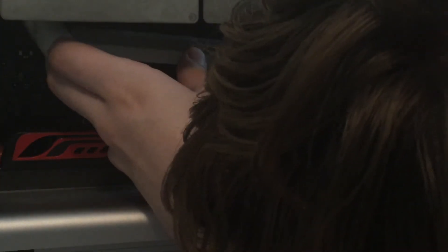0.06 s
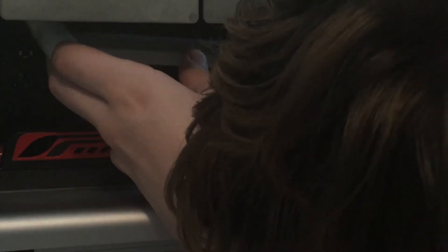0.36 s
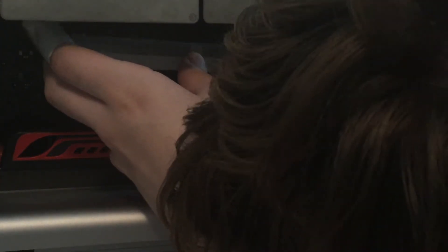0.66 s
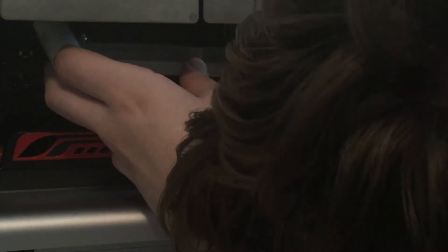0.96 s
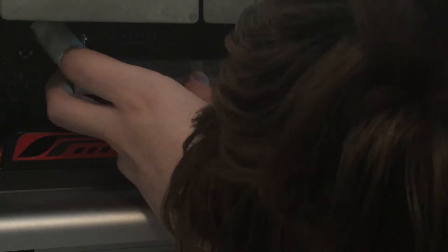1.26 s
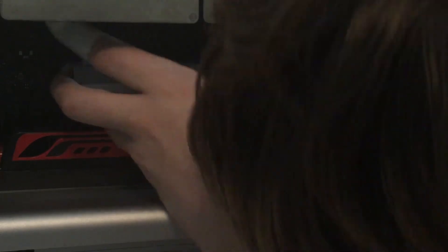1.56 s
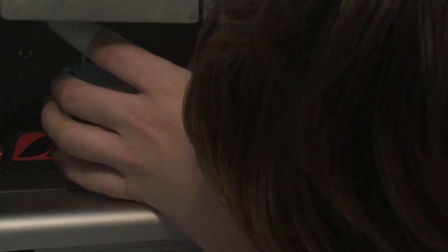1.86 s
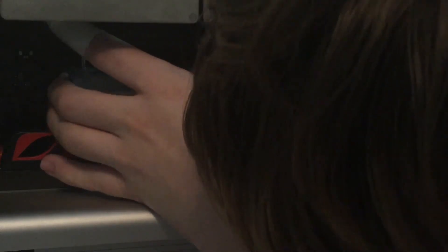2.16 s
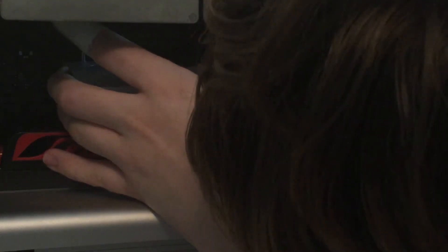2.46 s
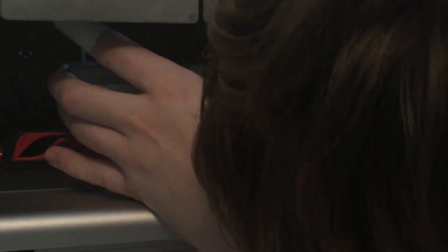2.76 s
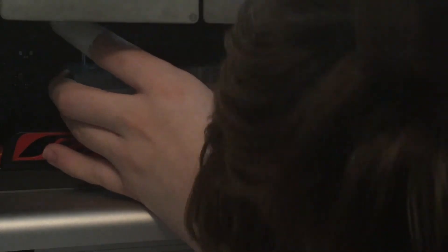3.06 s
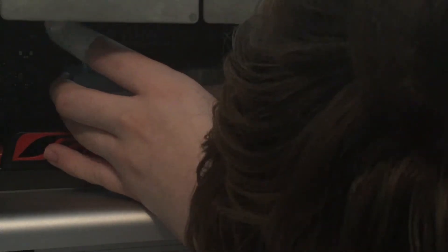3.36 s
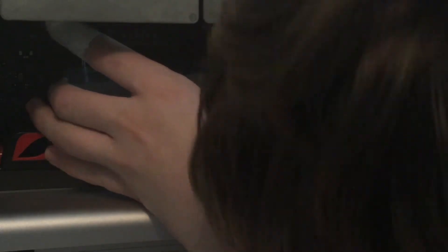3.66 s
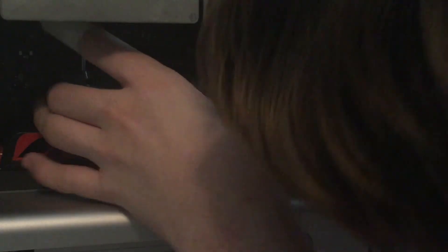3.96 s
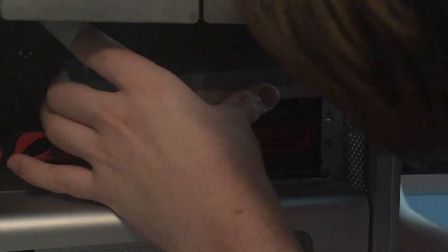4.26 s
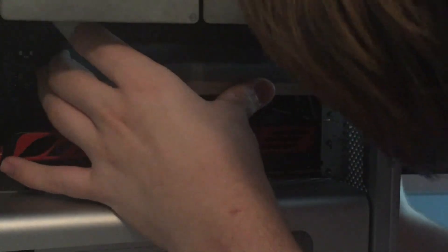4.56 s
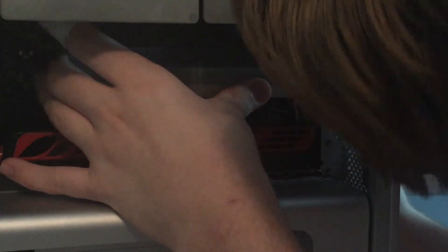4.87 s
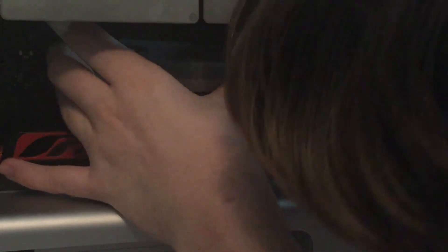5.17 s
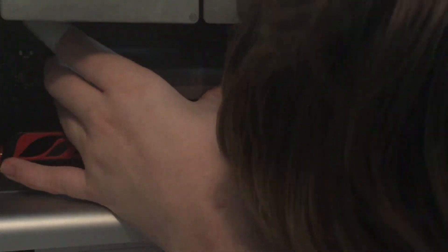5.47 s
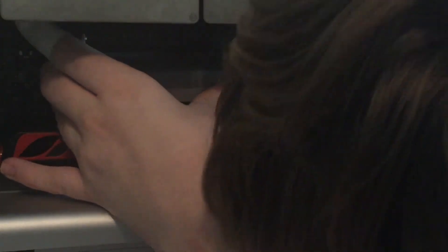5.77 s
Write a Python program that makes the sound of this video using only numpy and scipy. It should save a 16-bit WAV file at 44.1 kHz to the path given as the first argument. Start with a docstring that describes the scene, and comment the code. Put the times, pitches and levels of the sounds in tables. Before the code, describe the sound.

A circuit card knocks, clicks and scrapes against an open steel computer case as a hand works it into its slot.

```python
"""A circuit card knocks against an open steel computer case as it is worked by hand into its slot.
Bracket and edge stick and slip along the metal, scraping and squeaking, then let go and hit the frame.
Knocks and scrapes ring the case and the card; the desk reflects them and the small room rings on.
A faint hiss lies underneath."""
import sys
import numpy as np
from scipy import signal
from scipy.fft import rfft, irfft, next_fast_len
from scipy.io import wavfile

SR = 44100
rng = np.random.default_rng(int(sys.argv[2]) if len(sys.argv) > 2 else 0)


def transcribe(signal):
    """Save signal, clipped to [-1, 1], as a 16-bit WAV file at the path in sys.argv[1]."""
    frames = np.atleast_2d(signal).T
    limited = np.clip(frames, -1, 1)
    pcm = np.round(limited * 32767).astype(np.int16)
    wavfile.write(sys.argv[1], SR, pcm)


N = 265393

# Impacts on the frame. Each row: start in seconds, relative level in dB, brightness in dB per octave,
# card's share of the mode energy from 0 to 1, nearest mode in Hz.
KNOCKS = [(0.013, -43.5, -0.9, 0, 841), (0.031, -41.5, -4, 0.07, 375), (0.096, -61.5, 2.5, 0.14, 920),
          (0.2035, -31, -0.44, 0.07, 394), (0.214, -40.5, 4.5, 0.02, 675), (0.426, -39, -1, 1, 2000),
          (0.443, -40.5, -2, 0, 480), (0.8868, -42, -3.5, 1, 630), (0.9864, -41.5, -3, 0.25, 397),
          (1.0068, -38.5, -1, 0, 1030), (1.029, -45, -3.5, 0.5, 1260), (1.101, -47.5, -5, 0.2, 1190),
          (1.2268, -39.5, -2.5, 0.06, 743), (1.4045, -51, 3.5, 0.97, 2090), (1.4499, -50, 1.5, 0, 2260),
          (1.517, -44, 2.5, 0.46, 2200), (1.6794, -65, 12.5, 0.24, 3300), (1.762, -63.5, 9.5, 0.3, 2580),
          (2.187, -37.5, 4, 0.89, 423), (2.33, -43.5, -0.5, 0.08, 165), (2.437, -49, -4, 0.09, 285),
          (2.8602, -42, 2, 0.02, 2390), (3.0943, -25.5, -1.57, 0.06, 380), (3.3681, -48.5, 4, 0.77, 1270),
          (3.472, -63, -2.7, 0.5, 420), (3.948, -53.5, -4, 0.4, 235), (3.98, -50.5, 1, 0.78, 463),
          (4.182, -41.5, 0, 0.08, 458), (4.204, -52.5, -6.5, 0, 630), (4.257, -53.5, 1, 0, 990),
          (4.499, -60, 1.5, 0.7, 1800), (4.7458, -22.5, -0.5, 0.1, 3550), (4.7455, -44.5, 10, 0, 13000),
          (4.757, -29.5, -1.5, 0.2, 630), (4.8936, -30, -0.3, 0.15, 830), (5.0492, -43, 2.5, 1, 2270),
          (5.056, -52, -6, 0, 194), (5.598, -39.5, 5.5, 0.69, 2150), (5.603, -45, -5.5, 0.2, 410),
          (5.632, -50, 3, 0.73, 2210), (5.668, -53, 0.5, 0.45, 2080)]
# Sliding strokes, and at 5.616 s the loose card rattling on after the knock just before. Each row: start in
# seconds, # length in seconds, relative level in dB, brightness in dB per octave, swell over the stroke in dB,
# nearest mode in Hz.
SCRAPES = [(0.175, 0.012, -41, -0.8, 16, 880), (0.191, 0.038, -31.5, -1.5, -14.5, 625),
           (0.414, 0.057, -43.5, 1.8, 3, 387), (0.478, 0.11, -49, 0.1, -9, 1960),
           (0.808, 0.072, -52, 2.5, 4, 895), (0.961, 0.036, -47.5, 0.8, 4, 430),
           (1.155, 0.095, -48.5, -0.7, 6, 2030), (1.658, 0.026, -57, 5.5, 5, 3940),
           (1.882, 0.013, -62, 3.5, 12, 2580), (2.307, 0.023, -49.5, 0.5, 1, 2200),
           (2.617, 0.047, -66.5, 2.4, 2.5, 2280), (3.011, 0.072, -56.5, 2.3, -2, 480),
           (3.59, 0.026, -59, 1, 9, 424), (3.724, 0.072, -52.5, 0.8, 2, 286),
           (3.926, 0.16, -55.5, 2.1, -18.5, 9000), (4.142, 0.035, -47.5, 0.1, 10.5, 640.0),
           (4.188, 0.07, -50, -0.3, -1.5, 4000), (4.709, 0.055, -47.5, 1.7, 0.5, 1890.0),
           (4.873, 0.015, -29, -0.1, 14, 690.0), (5.248, 0.03, -66, -1.5, -12, 400),
           (5.557, 0.044, -58.0, 2, -5, 817.0), (5.616, 0.049, -50.5, 0.5, 12, 2060),
           (5.83, 0.044, -60.5, -1, -11, 460)]
# Slips locked to one pitch. Each row: start in seconds, length in seconds, pitch in Hz, level in dB.
SQUEAKS = [(1.873, 0.037, 2600, -55), (2.3, 0.035, 4420, -55), (3.004, 0.055, 4280, -63),
           (3.732, 0.035, 3050, -64), (4.243, 0.02, 945, -41.5), (4.878, 0.0083, 6800, -42.5)]
# Steel case modes. Each row: frequency in Hz, relative level in dB, T60 in seconds.
CASE_MODES = [(98.5, -11, 0.34), (161, -18.5, 0.39), (205.8, -12.5, 0.14), (282.1, -2.5, 0.15),
              (356, -7.5, 0.04), (404, 2, 0.16), (455.8, -4, 0.14), (564, -6.5, 0.017), (625, -4, 0.17),
              (723, -4, 0.12), (844, -3.5, 0.077), (927, -2.5, 0.11), (1067, -19.5, 0.29),
              (1310, -15.5, .13), (1634, -13.5, 0.16), (2005, -16, 0.068), (3236, -10, 0.13),
              (4210, -12, 0.059)]
# Modes of card and bracket. Each row: frequency in Hz, relative level in dB, T60 in seconds.
CARD_MODES = [(426.5, 0, 0.32), (646, -2.5, 0.13), (945, 0, 0.14), (1190, -10.5, 0.09), (1385, -7, 0.14),
              (1682, -17.5, 0.13), (2041, -5, 0.078), (2140, -3.5, 0.052), (2370, -16, 0.11),
              (3040, -12.5, 0.06), (3650, -15, 0.057), (4370, -30.5, .1)]
# Dense, weaker panel modes. Each row: frequency in Hz, relative spectral density in dB.
PANEL_SPECTRUM = [(50, -44), (130, -27.5), (200, -6), (290, 1.5), (450, 5.5), (900, -5.5), (1600, -3.5),
                  (3300, -5), (5500, -5), (10000, -16.5), (14000, -16.5)]
# Ring times. Each row: frequency in Hz, panel T60 in seconds, room T60 in seconds.
RING_TIMES = [(100, 0.15, 0.68), (385, 0.17, 0.36), (1180, 0.13, 0.41), (3500, 0.029, 0.28),
              (8300, 0.06, .27), (15000, 0.063, 0.11)]
# Steady background. Each row: frequency in Hz, relative spectral density in dB.
HISS_SPECTRUM = [(15, -51.5), (25, -33.5), (42, -8.5), (69, -1.5), (183, -7.5), (209, -11.5), (267, -5),
                 (331, -13.5), (582, -14), (722, -16), (826, -16), (6730, -25.5), (15500, -32)]
# Edges in Hz of five registers: thud, knock, clank, click, tick.
REGISTER_EDGES_HZ = [80, 300, 700, 1600, 6000, 15500]
# Base tone of contacts. Each row: register frequency in Hz, knock offset in dB, scrape offset in dB.
REGISTER_TONE = [(199, -4.5, -3.5), (464, 0.2, -1.5), (980, -0.84, -3.5), (2840, -5.5, -5),
                 (10800, -22, -21)]
# Frame's broad lift round a struck mode. Each row: nearest mode in Hz, lift in dB.
KNOCK_LIFT = [(400, 5), (850, 12), (2200, 5.5), (6000, 4.5)]

DESK_DELAY_S, DESK_DB, DESK_CUT_HZ = 0.0145, -19.5, 1700
PANEL_DB, ROOM_DB = -1.5, -12.5
KNOCK_DB, SCRAPE_DB = -1.3, -2.07
NEAR_DB, NEAR_OCTAVES = 7.5, 0.19   # boost of the modes nearest a contact
BOOM_HZ, BAFFLE_HZ = 108, 158   # the case's lowest boom; it radiates poorly below BAFFLE_HZ
CRACK_GAIN, CRACK_S = 1.97, 0.0018   # the struck spot sheds most of its energy at once
PIVOT_HZ, TILT_TOP_HZ = 930, 5300
SIZE = 2 ** 15   # samples per contact
AGE_S = np.arange(SIZE) / SR
BINS_HZ = np.maximum(np.fft.rfftfreq(SIZE, 1 / SR), 1)
REGISTER_HZ, KNOCK_TONE_DB, SCRAPE_TONE_DB = np.array(REGISTER_TONE).T


def from_db(db):
    """Decibels to gain."""
    return 10 ** (np.asarray(db) / 20)


def unit_energy(x):
    """Scale to energy 1."""
    return x / np.sqrt(np.sum(x ** 2) + 1e-20)


def at_hz(rows, hz, column=1):
    """Interpolate a table column over log frequency."""
    rows = np.array(rows)
    return np.interp(np.log(hz), np.log(rows[:, 0]), rows[:, column])


def add(out, start_s, sound):
    """Mix a sound in at start_s."""
    start = max(0, round(start_s * SR))
    out[start:start + len(sound)] += sound[:N - start]


def colour(x, curve_db):
    """Minimum-phase filter with the given gain per bin."""
    cepstrum = irfft(np.log(from_db(curve_db)))
    cepstrum[1:SIZE // 2] *= 2
    cepstrum[SIZE // 2 + 1:] = 0
    return irfft(rfft(x) * np.exp(rfft(cepstrum)))


def hiss(rms_db=-62):
    """Steady noise of room and microphone."""
    size = next_fast_len(N)
    hz = np.maximum(np.fft.rfftfreq(size, 1 / SR), 1)
    spectrum = rfft(rng.standard_normal(size)) * from_db(at_hz(HISS_SPECTRUM, hz))
    return from_db(rms_db) * np.sqrt(N) * unit_energy(irfft(spectrum, size)[:N])


def panel_field(room_rise_s=0.014):
    """Noise bands and their envelopes: dense panel modes die fast, the room lingers."""
    edges_hz = np.geomspace(60, 16500, 15)
    white = rng.standard_normal((2, N))
    bands, decays = [], []
    for k, (low, high) in enumerate(zip(edges_hz, edges_hz[1:])):
        hz = np.sqrt(low * high)
        band = signal.sosfilt(signal.butter(2, [low, high], "band", fs=SR, output="sos"), white[k % 2])
        bands.append(band * from_db(at_hz(PANEL_SPECTRUM, hz)))
        panel = np.exp(-np.log(1000) * AGE_S / at_hz(RING_TIMES, hz))
        room = np.exp(-np.log(1000) * AGE_S / at_hz(RING_TIMES, hz, column=2))
        room *= from_db(ROOM_DB) * (1 - np.exp(-AGE_S / room_rise_s))
        onset = 1 - np.exp(-AGE_S * hz * 1.77)   # lows start later
        decays.append(np.hypot(panel, room) * onset)
    return np.array(bands), np.array(decays)


def modes(table, scatter_db):
    """Decaying sines; each contact point draws new strengths and signs."""
    hz, db, t60_s = np.array(table).T[:, :, None]
    strength = from_db(db + scatter_db * rng.standard_normal(hz.shape)) * rng.choice([-1, 1], hz.shape)
    t = AGE_S[:SIZE // 3]
    rings = np.sum(strength * np.sin(2 * np.pi * hz * t) * np.exp(-np.log(1000) * t / t60_s), axis=0)
    return unit_energy(np.pad(rings, (0, SIZE - len(t))))


def touch_response(field, card_share, near_hz, spread_s=0.00098):
    """One touch spreads through case, card and panels, and echoes off the desk."""
    bands, decays = field
    start = rng.integers(0, N - SIZE)
    panels = unit_energy(np.sum(bands[:, start:start + SIZE] * decays, axis=0))
    case = np.sqrt(1 - card_share) * modes(CASE_MODES, scatter_db=5.0)
    card = np.sqrt(card_share) * modes(CARD_MODES, scatter_db=4.5)
    attack = (1 - np.exp(-AGE_S / spread_s)) * (1 + CRACK_GAIN * np.exp(-AGE_S / CRACK_S))
    direct = attack * (case + card + from_db(PANEL_DB) * panels)
    delayed = np.pad(direct, (int(DESK_DELAY_S * SR), 0))[:SIZE]
    echo = from_db(DESK_DB) * signal.lfilter(*signal.butter(1, DESK_CUT_HZ, fs=SR), delayed)
    near_db = NEAR_DB / (1 + (np.log2(BINS_HZ / near_hz) / NEAR_OCTAVES) ** 2)
    baffle = signal.butter(2, BAFFLE_HZ, "high", fs=SR, output="sos")
    return signal.sosfilt(baffle, colour(direct + echo, near_db))


def contact_tone(base_db, db_per_octave, near_hz, lift_db, width_octaves):
    """Register levels in dB: force sets the base, hardness the tilt, place a lift round near_hz."""
    tilt_db = db_per_octave * np.log2(np.minimum(REGISTER_HZ, TILT_TOP_HZ) / PIVOT_HZ)
    return base_db + tilt_db + lift_db / (1 + (np.log2(REGISTER_HZ / near_hz) / width_octaves) ** 2)


def set_registers(x, levels_db, boom_db, window_s):
    """Filter x so its first window_s nears the register levels, then shelve the deep bass."""
    count = int(window_s * SR)
    fade = np.minimum(1, np.arange(count)[::-1] / 128)
    edge_bins = np.searchsorted(BINS_HZ, REGISTER_EDGES_HZ)
    for _ in range(2):
        power = 2 * np.abs(rfft(x[:count] * fade, SIZE)) ** 2 / (SIZE * count)
        gain_db = levels_db - 10 * np.log10(np.add.reduceat(power, edge_bins)[:-1] + 1e-20)
        deep_db = min(gain_db[:2])
        x = colour(x, np.interp(np.log(BINS_HZ), np.log([BOOM_HZ, *REGISTER_HZ]), [deep_db, *gain_db]))
    return colour(x, boom_db / (1 + (BINS_HZ / BOOM_HZ) ** 6))


def squeaks(q=22):
    """Friction briefly feeds one narrow resonance."""
    out = np.zeros(N)
    for start_s, length_s, hz, db in SQUEAKS:
        rub = rng.standard_normal(SIZE) * np.sin(np.pi * np.minimum(AGE_S / length_s, 1))
        resonance = signal.iirpeak(hz, q, fs=SR)
        tone = signal.lfilter(*resonance, signal.lfilter(*resonance, rub))
        add(out, start_s, from_db(db) * np.sqrt(length_s * SR) * unit_energy(tone))
    return out


def scrapes(field, slips_per_s=1500, spread_db=4, card_share=0.33):
    """Stick-slip: tiny uneven impacts that swell or ease with hand pressure and hardly rock the case; the same
    dense impacts make the card's rattle after a knock."""
    out = np.zeros(N)
    for start_s, length_s, db, db_per_octave, swell_db, near_hz in SCRAPES:
        levels_db = contact_tone(SCRAPE_TONE_DB + db, db_per_octave, near_hz,
                                 lift_db=8.5, width_octaves=0.75)
        count = int(length_s * SR)
        slipping = rng.random(SIZE)[:count] < slips_per_s / SR
        direction, strength = rng.standard_normal((2, SIZE))[:, :count]
        slips = slipping * np.sign(direction) * from_db(spread_db * np.clip(strength, -2, 2))
        slips[0] = 1   # the grip breaks
        force = slips * from_db(swell_db * np.linspace(-1, 0, count))
        ring = signal.fftconvolve(touch_response(field, card_share, near_hz), force)[:SIZE]
        add(out, start_s, set_registers(ring, levels_db, boom_db=-6.5, window_s=count / SR + 0.004))
    return from_db(SCRAPE_DB) * out


def knocks(field, lead_in_s=0.009, lead_in_db=-17.5, touches_per_s=1500,
           chatter_db=-6, chatter_s=0.002, rattle_db=5, rattle_s=0.0052):
    """A faint swell of ticks, one impact, then chatter; the loose card rattles harder and longer."""
    out = np.zeros(N)
    t = AGE_S[:SIZE // 24]
    lead = int(lead_in_s * SR)
    low_cut = signal.butter(1, 600, "high", fs=SR, output="sos")   # chatter is too light to move the case
    for start_s, db, db_per_octave, card_share, near_hz in KNOCKS:
        levels_db = contact_tone(KNOCK_TONE_DB + db, db_per_octave, near_hz,
                                 lift_db=at_hz(KNOCK_LIFT, near_hz), width_octaves=0.5)
        levels_db[-1] -= 6.5 * card_share   # the card is duller than bare steel
        touches = rng.standard_normal(len(t)) * (rng.random(len(t)) < touches_per_s / SR)
        chatter = signal.sosfilt(low_cut, touches * np.exp(-t / (chatter_s + card_share * rattle_s)))
        impact = from_db(chatter_db + card_share * rattle_db) * unit_energy(chatter)
        impact[0] += 1   # the firm blow
        lead_in = from_db(lead_in_db) * unit_energy(touches[-lead:] * np.linspace(0, 1, lead) ** 2)
        force = np.r_[lead_in, impact]
        ring = signal.fftconvolve(touch_response(field, card_share, near_hz), force)[:SIZE]
        knock = set_registers(ring, levels_db, boom_db=7, window_s=lead / SR + 0.032)
        add(out, start_s - lead / SR, knock)
    return from_db(KNOCK_DB) * out


def scene():
    """Handling noises and hiss at one close microphone."""
    field = panel_field()
    return (knocks(field) + scrapes(field) + squeaks() + hiss())[None]


def record(dry, low_hz=45, top_hz=15500):
    """The microphone sheds deep bass; the top is cut steeply."""
    thin = signal.sosfilt(signal.butter(2, low_hz, "high", fs=SR, output="sos"), dry)
    return signal.sosfilt(signal.ellip(10, 0.2, 80, top_hz, fs=SR, output="sos"), thin)


dry = scene()
out = record(dry)
transcribe(out)
```